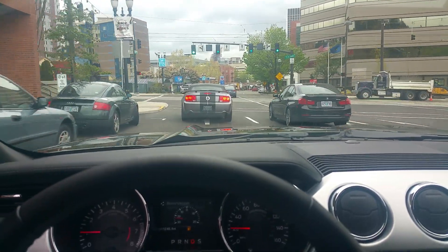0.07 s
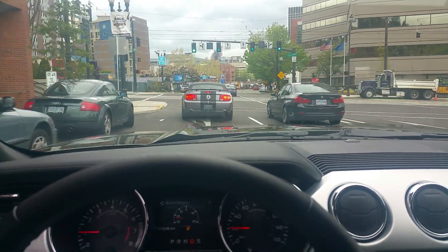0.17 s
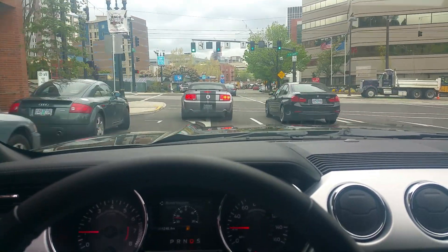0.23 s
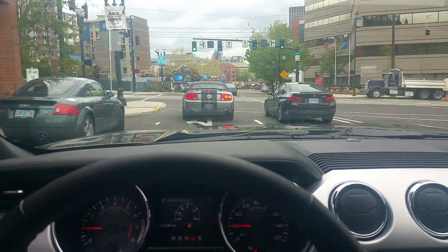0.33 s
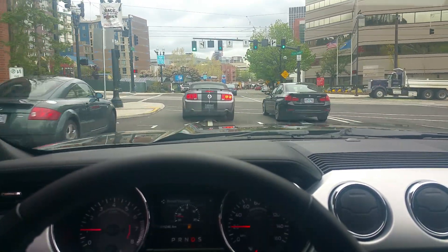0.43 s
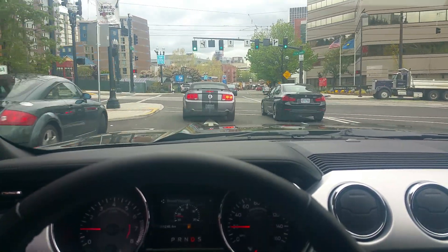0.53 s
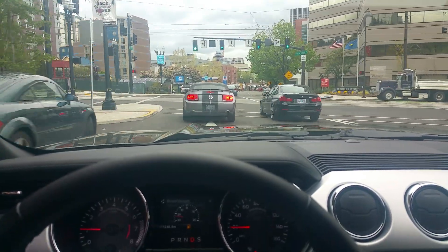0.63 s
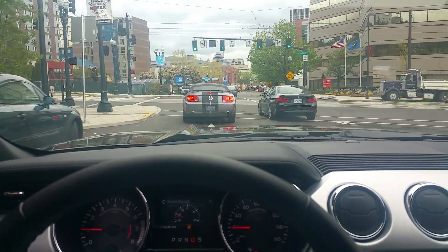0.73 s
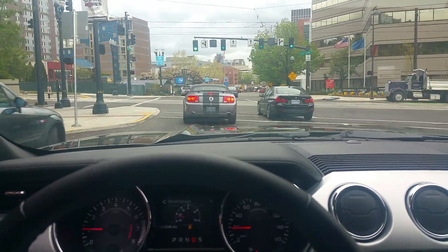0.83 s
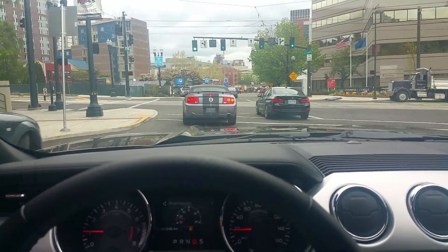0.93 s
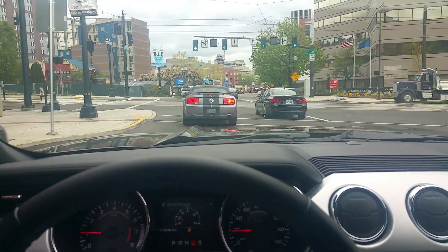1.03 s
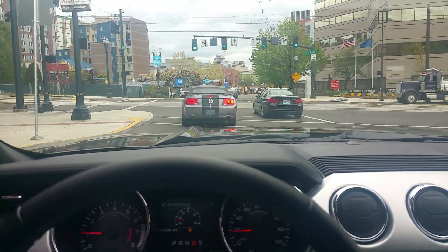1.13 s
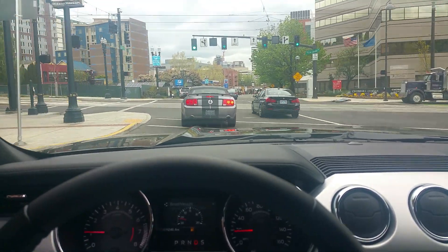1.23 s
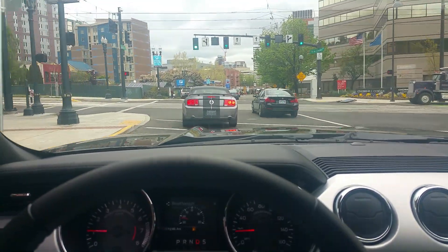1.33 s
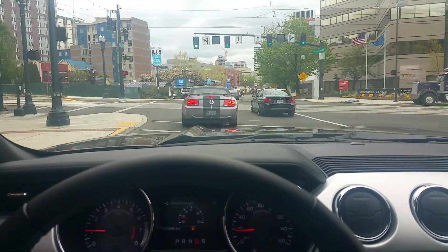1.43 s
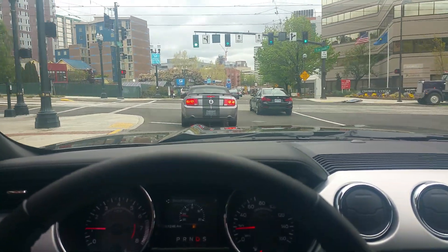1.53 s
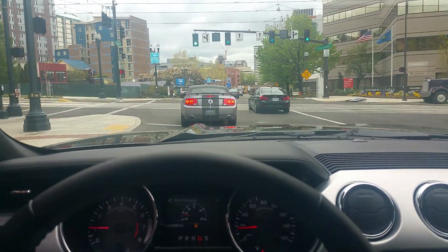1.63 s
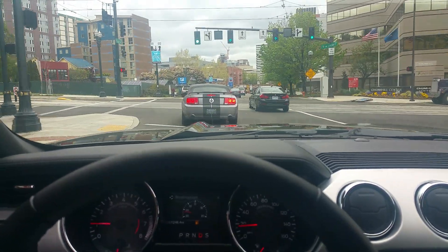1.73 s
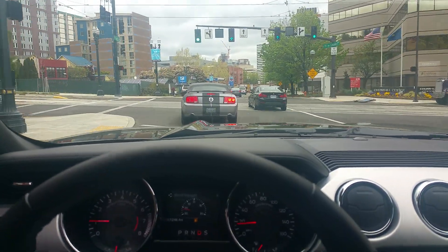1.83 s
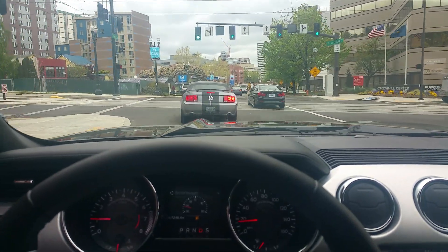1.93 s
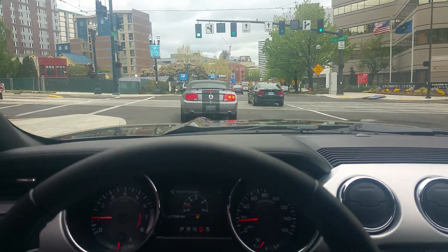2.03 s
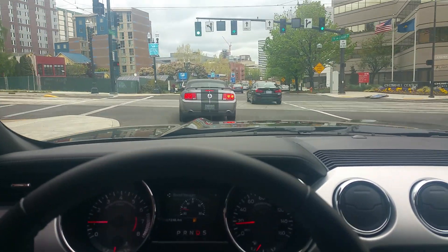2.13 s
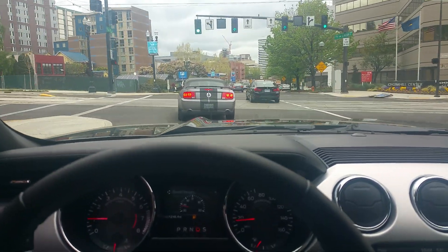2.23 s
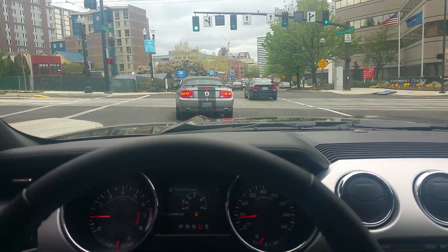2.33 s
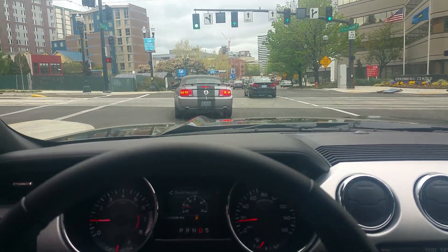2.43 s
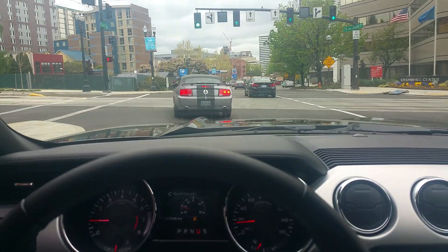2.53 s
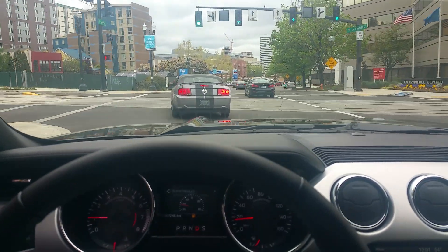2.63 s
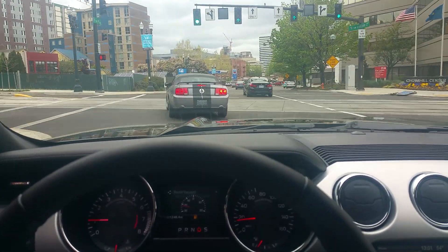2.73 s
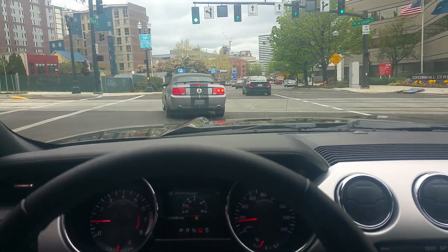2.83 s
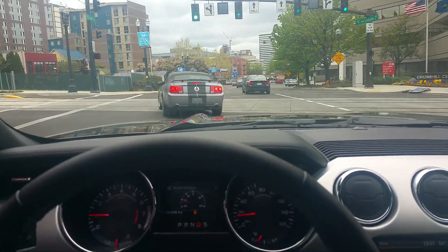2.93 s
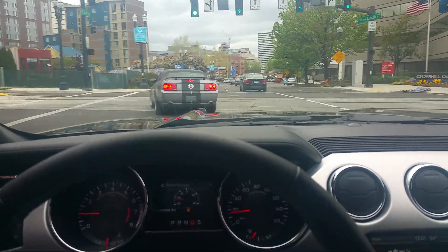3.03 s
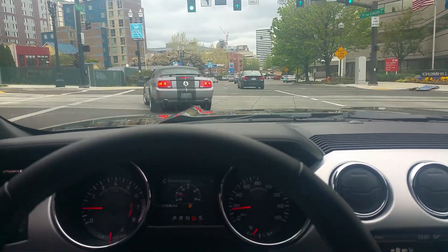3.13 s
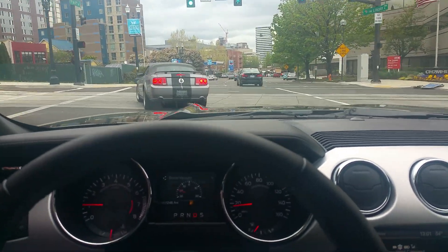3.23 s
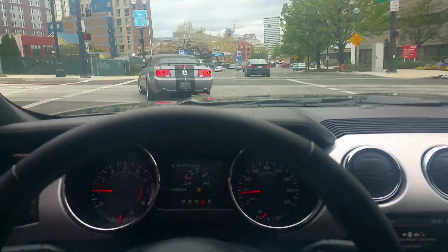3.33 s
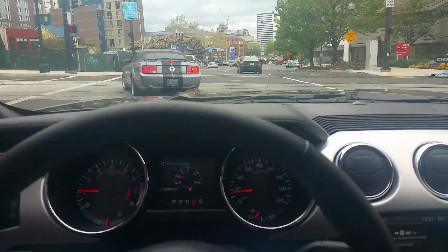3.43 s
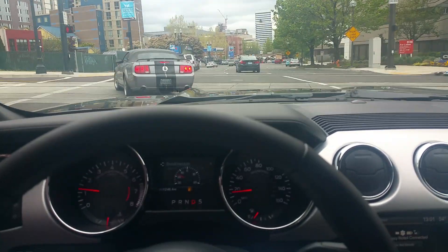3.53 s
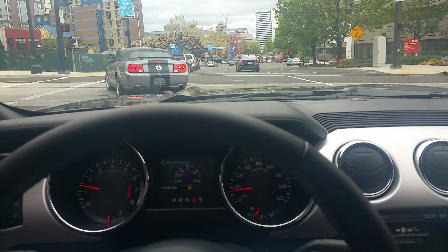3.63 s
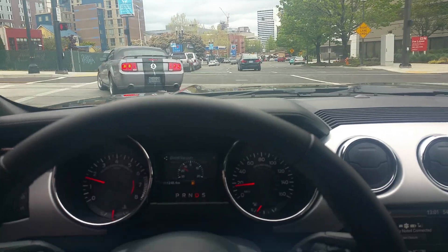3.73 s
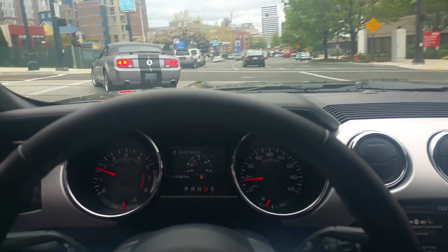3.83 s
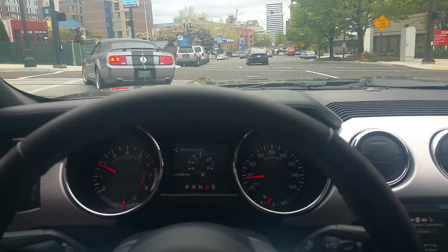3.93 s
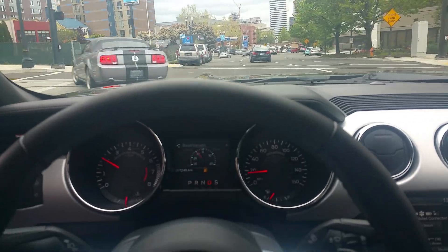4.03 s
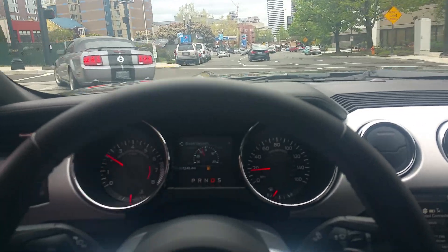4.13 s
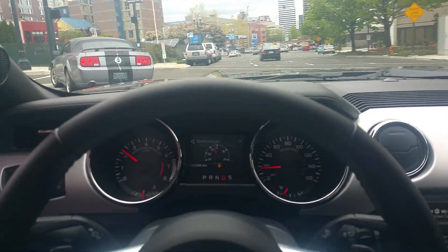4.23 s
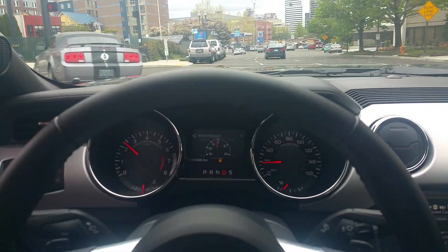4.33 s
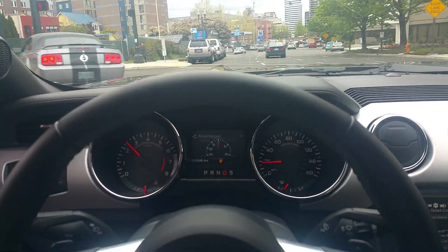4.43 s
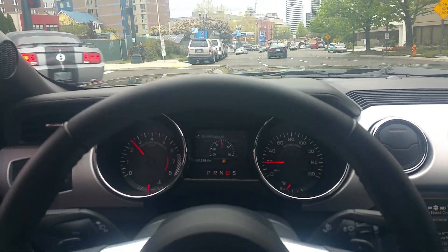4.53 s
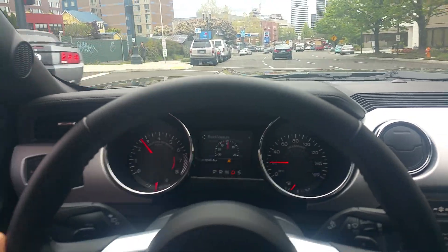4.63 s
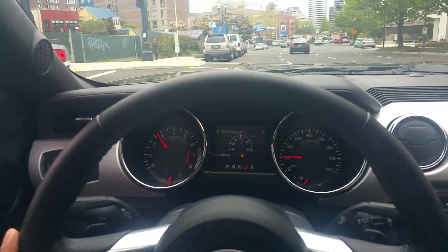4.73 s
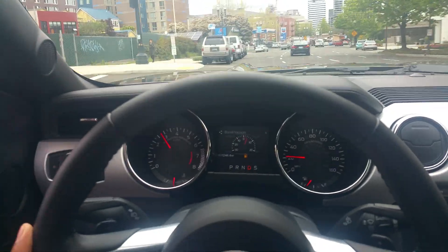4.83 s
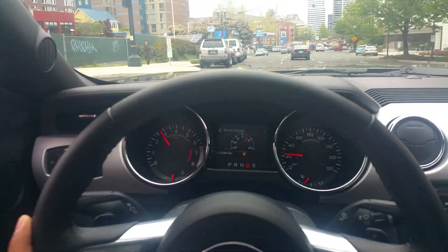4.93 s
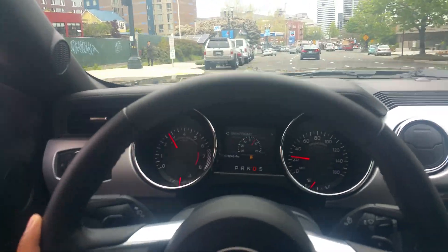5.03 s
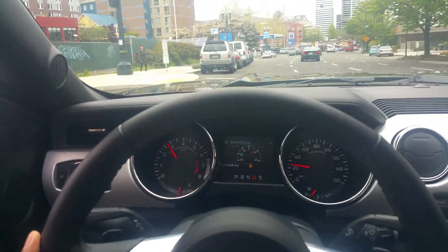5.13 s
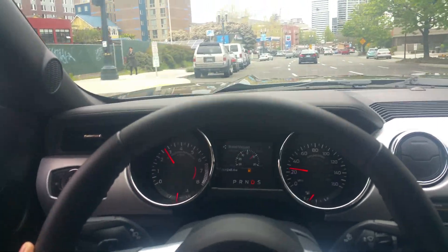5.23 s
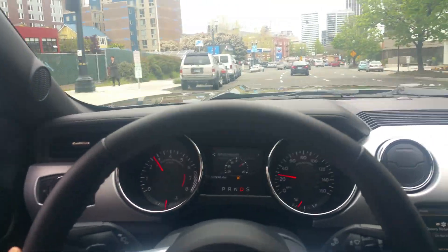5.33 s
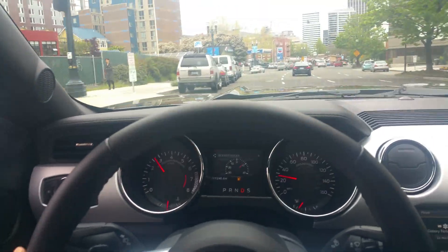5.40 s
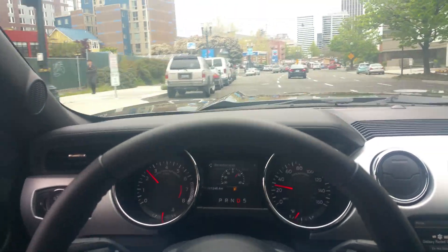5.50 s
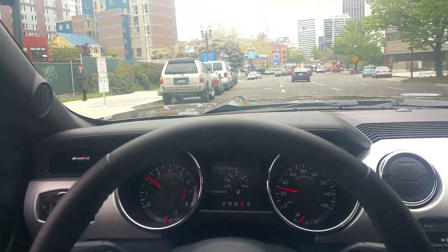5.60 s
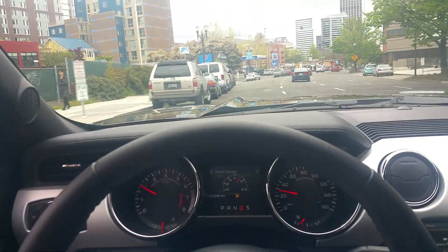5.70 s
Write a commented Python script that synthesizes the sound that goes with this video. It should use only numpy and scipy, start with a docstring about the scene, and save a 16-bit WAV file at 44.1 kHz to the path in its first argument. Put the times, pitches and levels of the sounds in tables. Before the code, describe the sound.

The sound is heard from the driver's seat of a closed car. From the start the engine ticks over with a low rumble, above steady road noise and a soft vent hiss. A brief ringing hiss dies away at once, and muffled cars swell past at the opening and around 0.7 and 1.4 seconds. A tiny, thin squeak comes at 2.7 seconds. At about 3.4 seconds the engine pulls, growing louder and climbing to a booming hum that peaks near 4.8 seconds, while the road rumble builds. A faint, breathy turbo whistle rises from about 4.2 seconds. Between 4.6 and 5 seconds plastic trim ticks lightly several times, close by. Dull suspension thumps come around 4.9 and 5.4 seconds. At about 5.3 seconds the car shifts up: the whistle stops, air hisses out, and the engine falls in pitch and level until the end, just before 6 seconds.

```python
"""City traffic from the driver's seat.

Two microphone capsules inside a closed car. Its turbocharged four-cylinder ticks over, then pulls
through one gear, the exhaust pulses gliding through the cabin's booms. The turbo whistles; at the
upshift the pitch drops and boost air hisses out. Road, tyres and passing cars come dulled through
the body. Close by, the vents hiss, something squeaks and a bit of plastic trim ticks."""
import sys
import numpy as np
from scipy import signal
from scipy.fft import rfft, irfft, next_fast_len
from scipy.io import wavfile

SR = 44100
rng = np.random.default_rng(int(sys.argv[2]) if len(sys.argv) > 2 else 0)


def inscribe(sig):
    """Save sig as 16-bit PCM at rate SR to the path in sys.argv[1].

    A 1-D sig is mono; a 2-D sig holds one channel per row.
    Samples are clipped to [-1, 1] before scaling.
    """
    pcm = np.round(np.clip(np.atleast_2d(sig).T, -1, 1) * 32767)
    wavfile.write(sys.argv[1], SR, pcm.astype(np.int16))


N = 254148
TIME = np.arange(N) / SR

# Idle, pull and upshift. Each row: time in seconds, firing rate in Hz, pulse strength in dB.
ENGINE_RUN = [(0, 35.4, -14.5), (.6, 36.44, -13.5), (1.3, 36.22, -14.5), (2.05, 32.52, -14.5),
              (2.6, 32.89, -14), (3.14, 33.06, -12), (3.24, 36.01, -11), (3.43, 38.38, -9.5),
              (3.5, 42.33, -5), (3.61, 52.43, -8), (3.83, 63.11, -6), (4.12, 74.26, -3.5),
              (4.28, 81.44, -2.5), (4.56, 91.65, -3.5), (4.68, 95.5, -4), (4.81, 97.32, -4),
              (5.04, 94.36, -3), (5.29, 92.96, -4), (5.41, 88.5, -5), (5.61, 63.7, -13), (5.76, 57.4, -18)]
# Exhaust pulse shape; halves come from unequal cylinders. Each row: firing-rate multiple, level in dB.
PULSE_MULTIPLES = [(.5, -16), (1, 1), (1.5, -12.5), (2, -4.5), (2.5, -16.5), (3, -9), (3.5, -28),
                   (4, -16.5), (4.5, -23.5), (5, -19.5), (6, -19.5)]
# Booms and nulls from exhaust to driver's seat. Each row: frequency in Hz, gain in dB.
CABIN_RESPONSE = [(35, -42.5), (55, -17.5), (70, -11.5), (95, -5), (115, 1), (135, -3.25), (155, -3.5),
                  (175, -9), (195, -18), (225, -18.5), (245, -23.5), (270, -12), (300, -11.5), (345, -9.5),
                  (390, -10), (440, -18), (490, -13.5), (580, -29)]
# Sound from engine bay and tailpipe meets and partly cancels.
# Each row: firing rate in Hz, gain of the second multiple in dB, gain of the third in dB.
INTERFERENCE = [(32.86, 5, -8), (37.4, -3, 0.4), (40, -0.5, 2), (58.8, -0.5, 1), (66, 3.5, 9.5),
                (70, 2.5, -17), (77, 1.5, -20.5), (81.18, -0.5, 11.5), (85, -1.5, 0), (91.22, -3.5, -0.3),
                (94.2, -4, 1), (93, -10, -0.1)]

# Whistling tones. Each row: time in seconds, pitch in Hz, level in dB.
TURBO_TRACK = [(4.1, 6500, -95), (4.25, 7200, -79), (4.5, 8600, -77.5), (4.65, 10600, -76),
               (5.3, 11300, -76), (5.4, 11000, -95)]
COMPRESSOR_TRACK = [(4.13, 10600, -100), (4.2, 11300, -81), (4.27, 12200, -80), (4.36, 12900, -81),
                    (4.45, 13200, -100)]
SQUEAK_TRACK = [(2.7, 4450, -100), (2.711, 4450, -60), (2.728, 4450, -60), (2.745, 4450, -100)]

# Trim ticks. Each row: start in seconds, level in dB, snap centre in Hz, relative ring gain in dB.
TRIM_TICKS = [(4.6125, -42, 6500, -16), (4.6355, -44, 6000, 0), (4.8045, -45.5, 8000, -20),
              (4.865, -51, 3800, -12), (4.9305, -43.5, 4500, -12), (5.004, -47.5, 6500, -16)]
# The plastic's modes. Each row: frequency in Hz, relative level in dB, seconds to fall by 60 dB.
TRIM_MODES = [(6000, 12, 0.0078), (4580, -11.5, .008), (8600, -13, 0.0071)]

# The car's pace. Each row: time in seconds, speed in metres a second.
ROAD_SPEED = [(0, 3.6), (3.3, 2.33), (3.8, 4.6), (4.5, 6.64), (5.2, 7.5), (5.76, 6.74)]
# Uneven road. Each row: peak time in seconds, level in dB, half length in seconds.
ROAD_BUMPS = [(2.0, -42, .2), (3.5, -37.5, .1), (4.9, -24.5, .15), (5.35, -22.5, .2)]
# Cars going by. Each row: peak time in seconds, roar in dB, bright hiss in dB, half length in seconds.
PASSING_CARS = [(0, -30.5, -59, 0.12), (0.667, -39, -63.5, 0.18), (1.361, -38, -61, 0.16),
                (2.624, -42.5, -76, .05)]

# Noise colours at the seat. Each row: frequency in Hz, relative spectral density in dB.
INTAKE_SPECTRUM = [(2600, -0.5), (4400, 0), (6800, -7), (8300, -8), (9200, -14.5), (11200, -8.5),
                   (13000, -19.5), (15700, -25.5)]
GUSH_SPECTRUM = [(2600, -1.5), (3000, -5.5), (3600, -0.5), (4400, 0), (5000, -3.5), (5600, -2.5),
                 (6800, -11.5), (7600, -5), (8300, -8.5), (9200, -16.5), (10500, -9.5), (11600, -10.5),
                 (13500, -17), (15000, -12), (15700, -19)]
GUSH_BODY_SPECTRUM = [(900, -14), (1300, -3), (1700, 0.5), (2100, -4.5), (2700, -17.5), (4000, -50)]
SUSPENSION_SPECTRUM = [(15, -39.5), (30, -18), (45, 0.5), (62, 6), (85, 3.5), (120, -15.5), (200, -72)]
RUMBLE_SPECTRUM = [(40, -29), (60, -13), (85, 1.5), (120, -5), (160, 1), (210, 0), (260, -10.5), (330, -12),
                   (450, -18), (600, -21), (900, -36.5), (1500, -79.5)]
TYRE_SPECTRUM = [(450, -6.5), (600, -9.5), (780, 3), (900, -2), (1150, -13), (1400, -8), (1650, -8),
                 (1900, -13.5), (2300, -19), (3000, -44)]
STREET_SPECTRUM = [(240, -34.5), (400, -8), (454, -15.5), (482, -10.5), (534, -12), (607, -11), (824, 0),
                   (1100, -5.5), (1200, -4.5), (1430, -6), (1650, -6), (2050, -10.5), (3050, -30),
                   (3960, -43), (6710, -120)]
RINGING_SPECTRUM = [(900, -22), (1250, -5), (1430, 6), (1700, -7), (2600, -9.5), (3100, -40), (3600, -17.5),
                    (4300, -32), (5600, -23), (6800, -37.5), (10000, -41), (12000, -57.5)]
VENT_SPECTRUM = [(2600, -2.5), (3000, -6), (3600, -8), (4400, -6.5), (5000, -12), (6200, -15),
                 (6800, -20.5), (7600, -21.5), (9200, -33), (12000, -38.5)]
TOP_HISS_SPECTRUM = [(7000, -9), (9200, -4), (11500, -0.5), (13500, -0.5), (15700, -4.5)]

# How those noises rise and fall. Each row: time in seconds, level in dB.
INTAKE_LEVEL = [(0, -77), (4.2, -78.5), (4.6, -69.5), (5.76, -71.5)]
STREET_LEVEL = [(0, -35.5), (1.62, -38.5), (1.68, -40.5), (3.77, -41.5), (3.85, -44), (5.25, -42.5),
                (5.76, -36)]
RINGING_LEVEL = [(0, -30), (.06, -32), (.15, -57), (5.76, -120)]
VENT_LEVEL = [(0, -59), (.3, -60.5), (1, -62.5), (2, -64.5), (3.4, -64.5), (3.7, -61), (4.3, -61.5),
              (5.3, -59.5), (5.76, -66)]
TOP_HISS_LEVEL = [(0, -74), (3.3, -74.5), (3.7, -73), (4.201, -82.5), (4.7, -81), (5.3, -80.5), (5.76, -78)]

# The part of a noise that is unlike at the two capsules. Each row: frequency in Hz, share in dB.
DIFFUSE_SHARE = [(300, -56.5), (900, -26), (2500, -41), (3200, -18), (4500, -15), (6500, -14.5),
                 (9000, -12.5), (10500, -24.5), (16000, -25.5)]
# Capsule sensitivity. Each row: frequency in Hz, left minus right in dB.
CAPSULE_MISMATCH = [(60, -.2), (400, -.3), (1100, -.9), (2000, 0), (2700, -.3), (3800, -5), (5400, -10),
                    (6200, -8), (6950, 0), (7400, 1), (8200, 6.5), (8900, 4.5), (9300, 1.5), (10300, 0)]


def from_db(db):
    """Decibels to gain."""
    return 10 ** (np.asarray(db) / 20)


def power_sum(*dbs):
    """Levels in dB added as powers."""
    return 10 * np.log10(sum(from_db(db) ** 2 for db in dbs))


def rms_one(x):
    """Scale to unit rms."""
    return x / np.sqrt(np.mean(x ** 2) + 1e-20)


def in_time(rows):
    """The columns after a table's time column as curves, one value a sample."""
    seconds, *columns = np.transpose(rows)
    return [np.interp(TIME, seconds, column) for column in columns]


def at_hz(points, hz):
    """Read a spectrum on a log-frequency axis."""
    points_hz, points_db = np.transpose(points)
    return np.interp(np.log(np.maximum(hz, 1)), np.log(points_hz), points_db)


def colour(x, gain_at):
    """Filter by a gain given as a function of frequency."""
    size = next_fast_len(N + SR // 10)
    return irfft(rfft(x, size) * gain_at(np.fft.rfftfreq(size, 1 / SR)), size)[..., :N]


def drift(rate_hz):
    """Slow random wander of unit rms: coarse noise through two one-pole low-passes."""
    stride, settle = 40, 2000
    pole = np.exp(-2 * np.pi * stride * rate_hz / SR)
    white = rng.standard_normal(N // stride + settle + 2)
    slow = signal.lfilter([1], [1, -2 * pole, pole * pole], white)[settle:]
    return np.interp(np.arange(N) / stride, np.arange(len(slow)), rms_one(slow))


def noise(spectrum, level_db, flicker_db, flicker_hz):
    """Flickering noise, nearly alike left and right, cut off below its spectrum's first row."""
    def mid_side_gain(hz):
        db = at_hz(spectrum, hz) + at_hz(DIFFUSE_SHARE, hz) * [[0], [1]]
        return from_db(db) * (hz > spectrum[0][0])

    mid, side = colour(rng.standard_normal((2, N)), mid_side_gain)
    stereo = (mid + side * [[1], [-1]]) / np.std(mid)
    return stereo * from_db(level_db + flicker_db * drift(flicker_hz))


def whistle(track, half_width_hz):
    """A band of noise carried on a moving pitch."""
    hz, db = in_time(track)
    breath = signal.sosfilt(signal.butter(4, half_width_hz, fs=SR, output="sos"), rng.standard_normal(N))
    return from_db(db) * rms_one(breath * np.sin(2 * np.pi * np.cumsum(hz) / SR))


def swells(rows):
    """A level in dB that swells and fades around each peak time, like something going by."""
    return power_sum(*(db - 20 * np.log10(1 + ((TIME - s) / half_s) ** 2) for s, db, half_s in rows))


def engine():
    """Exhaust pulses at the seat: each multiple swells and fades as it glides through the cabin's booms."""
    firing_hz, load_db = in_time(ENGINE_RUN)
    surge = np.interp(TIME, (3.35, 3.65, 4.25, 4.4), [0, 1, 1, 0])
    unequal_db = 1.23 - 9 * surge   # the cylinders even out while the revs surge
    eased_db = np.interp(TIME, (4.6, 5.6), (0, 4))   # throttle eases: the second multiple cancels less
    rates_hz, second_db, third_db = np.transpose(INTERFERENCE)
    interference_db = {2: np.interp(firing_hz, rates_hz, second_db) + eased_db,
                       3: np.interp(firing_hz, rates_hz, third_db)}
    roughness = from_db(0.28 * (load_db.max() - load_db))   # lean, light firings vary most
    jitter = .025 * roughness * drift(rate_hz=9)   # whole firings come early or late
    firing_phase = 2 * np.pi * np.cumsum(firing_hz) / SR + jitter
    out = np.zeros(N)
    for multiple, db in PULSE_MULTIPLES:
        is_half = multiple % 1 > 0
        edge_db = 0.32 * np.log2(multiple)
        source_db = load_db + db + edge_db + unequal_db * is_half
        seat_db = source_db + at_hz(CABIN_RESPONSE, multiple * firing_hz)
        seat_db += interference_db.get(multiple, 0)
        waver = roughness * np.sqrt(multiple)   # cycle-to-cycle unevenness
        seat_db += 0.65 * waver * drift(rate_hz=7)
        phase = multiple * firing_phase + 0.09 * waver * drift(rate_hz=7)
        phase -= 0.45 * multiple ** 2   # this lag spreads each pulse out
        phase += .045 * multiple * drift(rate_hz=35)   # rasp on the upper multiples
        phase += np.pi / 2 * is_half   # halves sit between the peaks
        out += np.sqrt(2) * from_db(seat_db) * np.cos(phase)
    return out


def turbo():
    """The turbo spools up: a breathy whistle and a thinner one from the compressor."""
    return whistle(TURBO_TRACK, half_width_hz=850) + whistle(COMPRESSOR_TRACK, half_width_hz=450)


def rushing_air():
    """The intake draws air, then the throttle shuts and boost gushes out; passing cars share its hiss."""
    shut_s, rise_s, fade_db_per_s = 5.326, .03, 2.5
    since_shut = np.maximum(TIME - shut_s, 1e-9)
    blow_off_db = -49.5 + 10 * np.log10(1 - np.exp(-since_shut / rise_s)) - fade_db_per_s * since_shut
    passing_db = swells((s, hiss_db, half_s) for s, _, hiss_db, half_s in PASSING_CARS)
    hiss = noise(GUSH_SPECTRUM, power_sum(passing_db, blow_off_db), flicker_db=1.5, flicker_hz=10)
    intake = noise(INTAKE_SPECTRUM, *in_time(INTAKE_LEVEL), flicker_db=0.3, flicker_hz=10)
    gush_body = noise(GUSH_BODY_SPECTRUM, blow_off_db + 7.5, flicker_db=0.6, flicker_hz=10)
    return hiss + intake + gush_body


def rolling():
    """From under the seat: suspension thump, floor rumble and tyres, each growing as a power of speed."""
    speed_db = 20 * np.log10(in_time(ROAD_SPEED)[0])   # 0 dB at 1 m/s
    thump_db = power_sum(-55.5 + 1.5 * speed_db, swells(ROAD_BUMPS))
    thump = noise(SUSPENSION_SPECTRUM, thump_db, flicker_db=2.5, flicker_hz=5)
    rumble = noise(RUMBLE_SPECTRUM, -37.5 + 0.95 * speed_db, flicker_db=0.54, flicker_hz=8.6)
    tyres = noise(TYRE_SPECTRUM, -74.5 + 1.995 * speed_db, flicker_db=1.8, flicker_hz=8)
    return thump + rumble + tyres


def street():
    """Traffic beyond the glass, swelling to a dull roar as each car goes by."""
    passing_db = swells((s, roar_db, half_s) for s, roar_db, _, half_s in PASSING_CARS)
    level_db = power_sum(*in_time(STREET_LEVEL), passing_db)
    return noise(STREET_SPECTRUM, level_db, flicker_db=0.92, flicker_hz=8)


def trim():
    """Trim ticks near the microphone: each a broad snap with a short ring of the plastic's modes."""
    rise_s, snap_decay_s, half_width_octaves = 0.00075, 0.0017, 1.1
    out, t = np.zeros(N), np.arange(SR // 20) / SR
    attack = 1 - np.exp(-t / rise_s)
    ring = sum(from_db(db - 60 * t / t60) * np.sin(2 * np.pi * hz * t) for hz, db, t60 in TRIM_MODES)
    for start_s, db, centre_hz, ring_db in TRIM_TICKS:
        edges_hz = np.minimum(centre_hz * 2.0 ** (half_width_octaves * np.array([-1, 1])), SR * .45)
        band = signal.lfilter(*signal.butter(1, edges_hz, "band", fs=SR), rng.standard_normal(len(t)))
        snap = rms_one(band) * np.exp(-t / snap_decay_s)
        start = round(start_s * SR)
        out[start:start + len(t)] += from_db(db) * (snap + from_db(ring_db) * ring) * attack
    return out


def squeak():
    """One brief, thin squeak in the cabin."""
    return whistle(SQUEAK_TRACK, half_width_hz=15)


def ringing_hiss():
    """A ringing hiss that dies away in the first moments."""
    return noise(RINGING_SPECTRUM, *in_time(RINGING_LEVEL), flicker_db=1.0, flicker_hz=9)


def cabin_air():
    """Air from the vents, and a faint top hiss that sinks while the engine is loud."""
    vents = noise(VENT_SPECTRUM, *in_time(VENT_LEVEL), flicker_db=0.26, flicker_hz=9)
    top_hiss = noise(TOP_HISS_SPECTRUM, *in_time(TOP_HISS_LEVEL), flicker_db=0.2, flicker_hz=9)
    return vents + top_hiss


def scene():
    """All sources as they reach the driver's seat."""
    wash = street() + rushing_air() + ringing_hiss() + cabin_air()
    centred = turbo() + squeak() + trim() + engine()
    return wash + centred + rolling()


def record(dry):
    """The two capsules differ in the treble; peaks are rounded and the top is cut."""
    ceiling, cutoff_hz = 2.1, 15730
    capsules = colour(dry, lambda hz: from_db(at_hz(CAPSULE_MISMATCH, hz) / 2 * [[1], [-1]]))
    rounded = ceiling * np.tanh(capsules / ceiling)
    return signal.sosfilt(signal.ellip(12, .5, 60, cutoff_hz, fs=SR, output="sos"), rounded)


dry = scene()
out = record(dry)
inscribe(out)
```